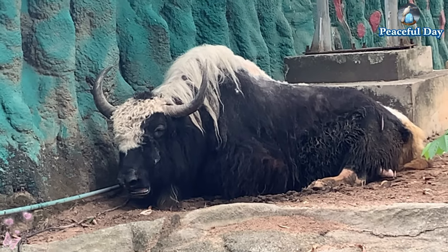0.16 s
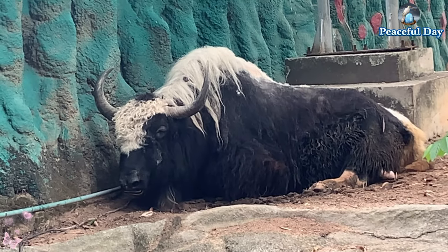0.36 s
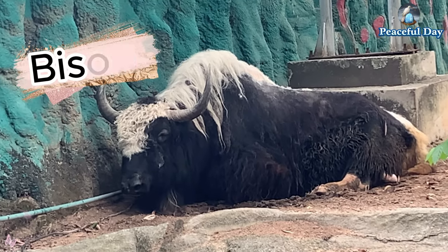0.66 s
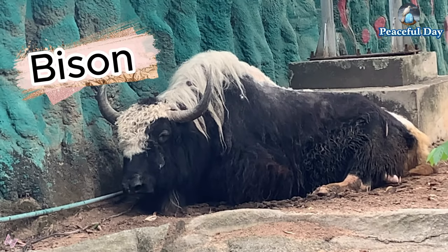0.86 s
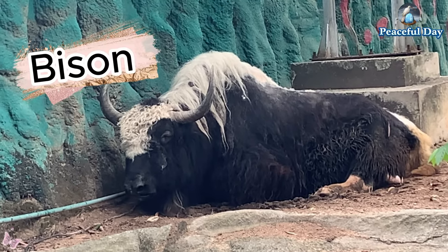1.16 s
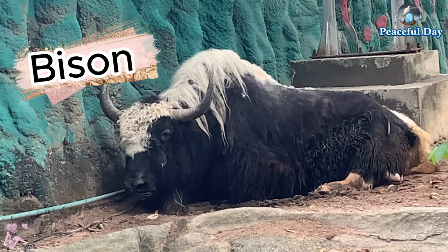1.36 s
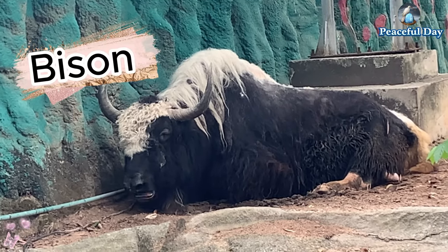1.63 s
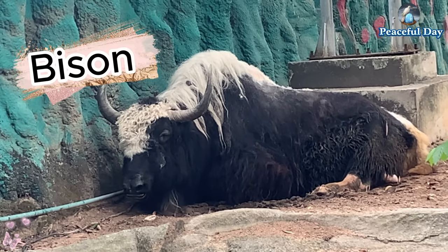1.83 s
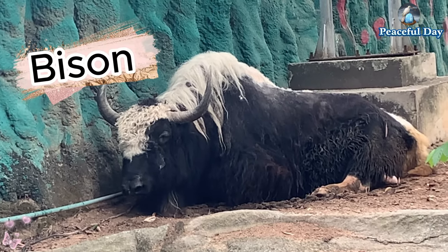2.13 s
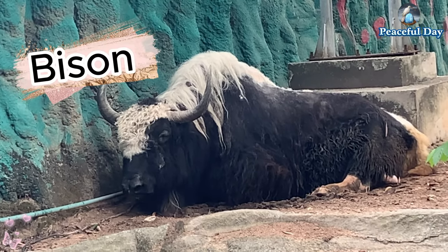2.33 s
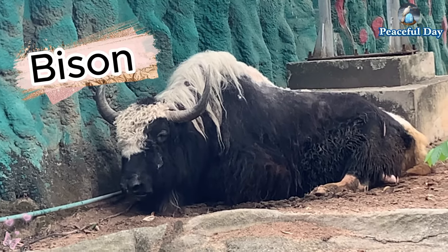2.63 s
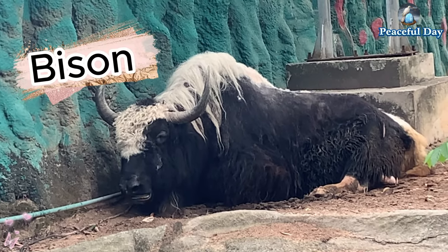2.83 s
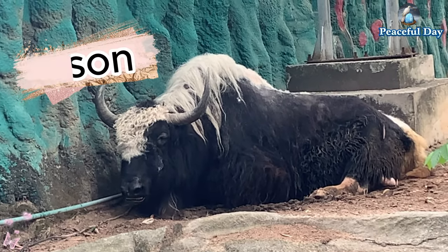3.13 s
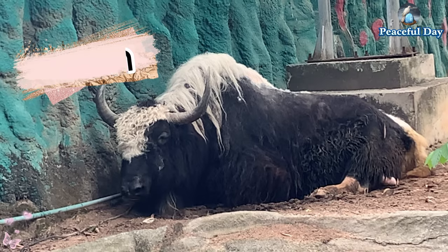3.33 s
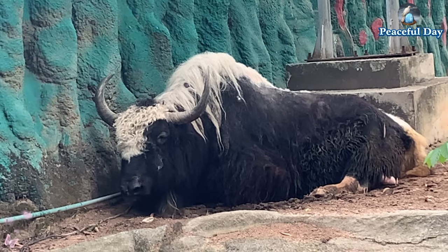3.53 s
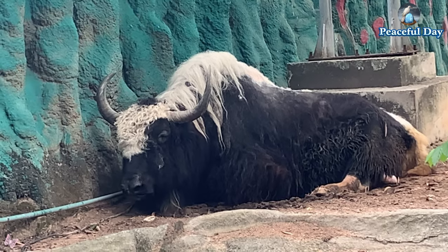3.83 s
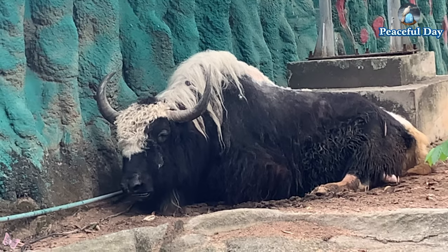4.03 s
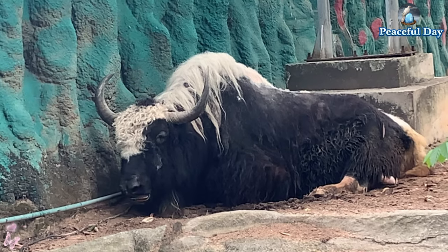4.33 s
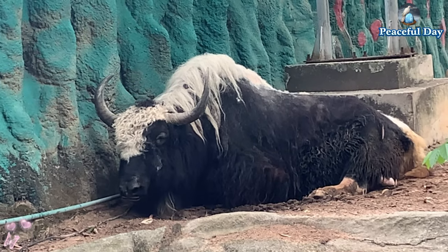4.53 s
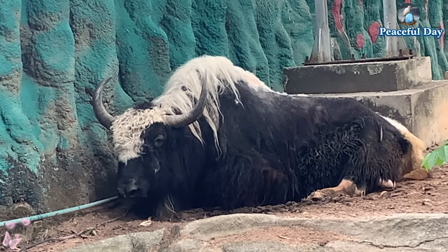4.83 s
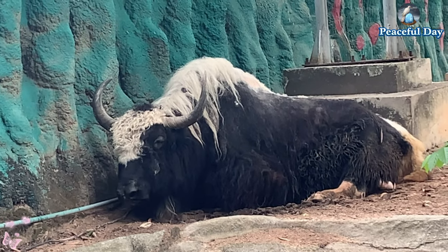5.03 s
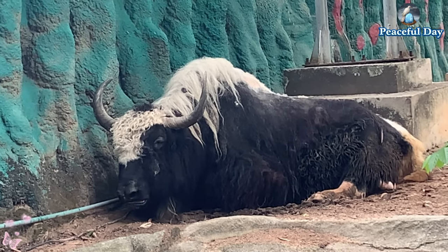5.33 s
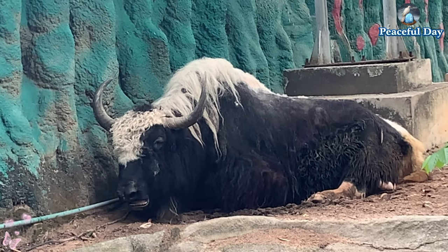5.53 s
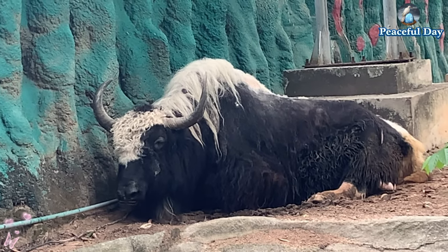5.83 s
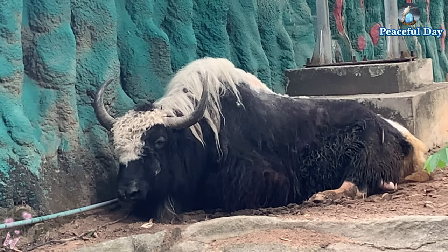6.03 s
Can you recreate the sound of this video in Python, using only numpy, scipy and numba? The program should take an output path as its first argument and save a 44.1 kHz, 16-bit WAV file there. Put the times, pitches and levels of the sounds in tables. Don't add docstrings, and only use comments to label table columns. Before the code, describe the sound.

A big shaggy yak rests close to the microphone in a hard-walled outdoor pen. It gives five low, pulsing grunts with short gaps. The first is strongest and sags into a slow croak with chest gulps and tiny nostril squeaks; the second flutters and rattles; the third and last fall steeply in pitch. Straw rustles, grit ticks, wind nudges the microphone, and faint town rumble and hiss stay beneath.

```python
import sys
import numpy as np
from scipy import signal
from scipy.fft import rfft, irfft, next_fast_len
from scipy.io import wavfile
from scipy.ndimage import uniform_filter1d
from numba import njit

SR = 44100
rng = np.random.default_rng(int(sys.argv[2]) if len(sys.argv) > 2 else 0)


def pcm_store(signal):
    levels = np.round(np.clip(np.atleast_2d(signal), -1, 1) * 32767)
    wavfile.write(sys.argv[1], SR, levels.astype(np.int16).T)


def boost(x):
    u = np.asarray(x, float) / 20
    return 10 ** u


N = 272097

# start_s, rate_hz [flaps per s], level_db
PALATE_FLUTTER = [
    (1.62, 29.1, -60),
    (1.918, 31.6, -14),
    (1.99, 31.6, -4),
    (2.18, 31.6, 1),
    (2.19, 28.6, -3),
    (2.32, 28.6, -7),
    (2.33, 25.5, -10),
    (2.45, 25, -20),
    (2.7, 24, -60),
]


def time():
    return np.arange(N) / SR


def bump(s, rise_s, fall_s):
    return np.maximum((s - time()) / rise_s, (time() - s) / fall_s)


def moments(table):
    return sum(height * np.exp(-bump(s, half_s, half_s) ** 2) for s, half_s, height in table)


def sounding(table):
    s, *columns = np.transpose(table)
    gate = np.interp(time(), [s[0] - .02, s[0], s[-1], s[-1] + .02], [0, 1, 1, 0])
    return gate, [np.interp(time(), s, c) for c in columns]


def steady(x, span_s):
    return x / np.sqrt(uniform_filter1d(x ** 2, int(span_s * SR)) + 1e-12)


@njit
def svf(x, hz, width):
    y, b, l = np.empty(len(x)), 0., 0.
    for i in range(len(x)):
        g = np.tan(np.pi * hz[i] / SR)
        k = np.pi * width / SR * (1 + g * g) / g
        v = (b + g * (x[i] - l)) / (1 + g * (g + k))
        b, l, y[i] = 2 * v - b, l + 2 * g * v, k * v
    return y


def band(x, hz, width):
    return svf(x + 1e-18, np.clip(hz, 20, .45 * SR) + np.zeros(N), float(width))


def ring(x, hz, width):
    once = band(x, hz, width)
    twice = band(once, hz, 0.51 * width)
    return band(twice, hz, 1.93 * width)


def decay(x, fall_s):
    return signal.lfilter([1], [1, -np.exp(-1 / (fall_s * SR))], x)


def walk(rate):
    k = int(SR / rate)
    held = np.repeat(rng.standard_normal(400), k)[:N]
    return 1.3 * uniform_filter1d(uniform_filter1d(held, k), k)


def colour(x, points):
    hz, db = np.transpose(points)
    size = next_fast_len(N)
    f = np.arange(1, size // 2 + 2) * SR / size
    gain = boost(np.interp(np.log(f), np.log(hz), db))
    y = irfft(rfft(x, size) * gain, size)[:N]
    return y / np.std(y)


def pulses(hz, rough, jitter, scatter_db):
    at = np.flatnonzero(np.diff(np.floor(np.cumsum(hz) / SR)) > 0)
    chance = rng.standard_normal((200, 2))[:len(at)].T
    place = np.clip(at + jitter * rough[at] * chance[0] * SR / hz[at], 0, N - 2)
    size = boost(scatter_db * rough[at] * chance[1])
    out, whole = np.zeros(N), place.astype(int)
    out[whole] = size * (1 - place + whole)
    out[whole + 1] = size * (place - whole)
    return out


def calling():
    # start_s, pitch_hz [fold pulses], level_db [effort], open_db [throat over chest]
    grunt_1 = [(.53, 46.4, -65, 0), (.584, 46, -28, 12), (.662, 46.87, -34.5, 20), (.774, 46.48, -19.5, 17),
               (.81, 42.7, -25.5, 24), (.845, 38.46, -19, -13.5), (.9, 38.1, -17, 1), (.99, 38.3, -20, 1.5),
               (1.08, 30.6, -20, 10)]
    tail_1 = [(1.1, 30.02, -33, 17), (1.14, 28.25, -22, -2.5), (1.19, 27.45, -21, -7),
              (1.245, 27.44, -28.5, -4), (1.3, 25.76, -34, -3), (1.368, 26.75, -36.5, -6),
              (1.41, 25.9, -33.5, -38), (1.5, 24.2, -36, -14), (1.62, 24.3, -58, -6)]
    grunt_2 = [(1.62, 29.1, -42.5, -1), (1.724, 30, -40, -10.5), (1.884, 31.3, -32.5, -12),
               (2.044, 31.6, -31.5, -3), (2.134, 31.6, -30.5, -5), (2.212, 28.6, -29.5, 0.5),
               (2.344, 25.4, -35.5, -4.5), (2.59, 24.4, -44, -11), (2.7, 24, -59, -3)]
    grunt_3 = [(2.8, 77.83, -59, 8), (2.851, 75.3, -32.5, -3), (2.877, 69, -27.5, -9),
               (2.919, 62.94, -30.5, 2), (2.96, 54.9, -25, 0), (3.01, 46.67, -26.5, -6),
               (3.099, 42.45, -26, -10), (3.25, 41.18, -23, -18), (3.35, 41.6, -26, -7)]
    tail_3 = [(3.36, 29.26, -24.5, -8), (3.414, 28.6, -34.5, -7), (3.614, 29.54, -31.5, -12.5),
              (3.71, 30.3, -30.5, -22), (3.744, 30.3, -36, -19), (3.83, 29.7, -42, -16),
              (3.88, 27.4, -68, -20)]
    grunt_4 = [(4.02, 47.02, -43.5, -7.5), (4.117, 45.5, -29, 5.5), (4.199, 46.04, -28, 7.5),
               (4.3, 47.48, -28, 12.5), (4.4, 46.5, -29, 12), (4.47, 44.4, -29.5, 12),
               (4.526, 42.8, -26.5, -2), (4.54, 41.7, -26, 14)]
    tail_4 = [(4.56, 44.1, -31, -1.5), (4.61, 44.8, -28.5, 19), (4.68, 45, -29, -13),
              (4.719, 43, -30.5, 17), (4.749, 41, -27.5, 14), (4.78, 39.4, -40.5, 11),
              (4.82, 36.26, -48, -8)]
    grunt_5 = [(5.53, 81.8, -51, -17), (5.598, 79.4, -28, -18), (5.696, 70.7, -22, -6),
               (5.848, 68.7, -26, -5.5), (5.933, 66.7, -32.5, 3), (6.0, 62.1, -30, -8),
               (6.052, 57.3, -30.5, -6), (6.136, 47.6, -26, -25), (6.17, 50.3, -38, -25)]
    # chest_hz, open_hz [throat], shut_hz [throat], mouth_hz, nose_hz
    airways = [
        (152, 230.3, 204, 480, 950),
        (153.5, 225, 207, 760, 1020),
        (144.4, 260, 217, 423, 1260),
        (138, 198.5, 197.7, 535, 1110),
        (139.5, 218, 181, 570, 1090),
        (157, 227, 192.5, 564, 912),
        (141.4, 157, 191, 522, 920),
        (136, 202, 219, 575, 1100),
    ]
    # chest_hz, throat_hz, mouth_hz, nose_hz
    widths = [(30.3, 54.5, 102, 270), (46.7, 34, 64, 230), (51.5, 135, 98, 540), (101, 36, 58, 860),
              (51.7, 71, 170, 310), (30.5, 32, 220, 200), (32, 44, 140, 310), (60, 40, 350, 810)]
    branches = [(-17.5, -16, -22, -17.5), (-16, -23.5, -34, -5), (-12.5, -5.5, -34, 13),
                (-36, -27, -14.5, -23.5), (-32, -21, -26.5, 7), (-11.5, -9.5, -21.5, 8),
                (-13.5, -14, -20.5, -7), (-20, -25, -21, -16)]
    # centre_s, half_length_s, level_db
    catches = [
        (0.624, 0.028, -22),
        (0.765, 0.012, -20.5),
        (1.014, 0.013, -4),
        (3.359, 0.0073, -4),
        (4.152, 0.0052, -20),
        (4.339, 0.0084, -10),
        (4.418, 0.0053, -18),
        (4.547, 0.0094, -14),
    ]
    calls = (grunt_1, tail_1, grunt_2, grunt_3, tail_3, grunt_4, tail_4, grunt_5)
    rough = [roughness()] * len(calls)
    return boost(moments(catches)) * sum(map(grunt, calls, airways, widths, branches, rough))


def roughness():
    # centre_s, half_length_s, added roughness [0-1]
    ragged = [(.7, .14, .14), (1.05, .06, .22), (1.25, .3, .05), (1.72, .22, .22), (2.15, .2, .05),
              (2.55, .2, .26), (2.85, .12, .12), (3.36, .035, .28), (3.95, .13, .27), (4.4, .2, .04),
              (4.58, .04, .1), (5.75, .2, .03), (6.17, .1, .05)]
    return .03 + moments(ragged)


def grunt(table, airway_hz, head, branch_db, rough):
    # centre_s, half_length_s, level_db
    snorts = [
        (.765, 0.028, 16.5),
        (.9, 0.042, 6),
        (2.9, .04, 7.5),
        (3.02, 0.039, 6),
        (4.24, .04, -1),
        (5.7, 0.077, 3.5),
    ]
    gate, (hz, effort_db, open_db) = sounding(table)
    chest_hz, open_hz, shut_hz, mouth_hz, nose_hz = airway_hz
    chest_width, throat_width, mouth_width, nose_width = head
    sinus_db, mouth_db, nose_db, nose_fade_db = branch_db

    share = 1 / (1 + boost(-2 * open_db))
    slack_db = np.clip(effort_db + 22, -25, 5)
    chest_db = effort_db + 10 * np.log10(1 - share)
    throat_db = effort_db + 10 * np.log10(share)
    mouth_db = effort_db + mouth_db + 0.11 * slack_db + 0.71 * (throat_db - effort_db)
    nose_db = effort_db + nose_db + 0.21 * slack_db + moments(snorts)
    nose_db = nose_db + nose_fade_db * np.clip(time() - table[0][0], 0, 1)

    chest_hz = chest_hz * (1 + 0.0028 * slack_db)
    mouth_hz = mouth_hz * (1 + 0.012 * slack_db)
    throat_hz = shut_hz + (open_hz - shut_hz) / (1 + boost(-open_db))

    flapping, (flap_hz, _) = sounding(PALATE_FLUTTER)
    pace_hz = np.where(flapping > 0, flap_hz, hz * (gate > 0))
    folds = pulses(pace_hz, rough, jitter=.22, scatter_db=8)
    puff = decay(folds, 0.015) * rng.standard_normal(N)
    voice = folds + 0.053 * rough * puff
    airy = folds + .025 * puff
    layers = [(chest_db, ring(voice, chest_hz, chest_width)),
              (throat_db, ring(voice, throat_hz, throat_width)),
              (throat_db + sinus_db, ring(voice, 302, 106)),
              (mouth_db, ring(airy, mouth_hz, mouth_width)),
              (nose_db, ring(airy, nose_hz, nose_width))]
    return gate * sum(boost(db) * steady(x, 0.0606) for db, x in layers)


def flutter():
    # centre_hz, width_hz, level_db
    palate = [
        (330, 800, 6),
        (620, 650, -1),
        (1130, 200, -5),
        (2390, 280, -5.5),
        (3750, 350, -18),
        (7600, 900, -14),
    ]
    gate, (hz, db) = sounding(PALATE_FLUTTER)
    slaps = pulses(hz * (gate > 0), np.ones(N), jitter=.01, scatter_db=1.5)
    slaps = slaps + .012 * decay(slaps, .003) * rng.standard_normal(N)
    late = np.roll(slaps, int(.001 * SR))
    rung = 0
    for f, width, level_db in palate:
        struck = late if f > 1000 else slaps
        rung = rung + boost(level_db) * ring(struck, f, width) / np.sqrt(width)
    return gate * boost(db - 40.5) * rung / np.std(rung[gate > 0])


def squeaks():
    # peak_s, pitch_hz [at the peak], level_db [peak]
    whistles = [(.975, 4600, -62), (.982, 2760, -56), (1.0, 4500, -62), (1.015, 2960, -60),
                (1.022, 4164, -60), (1.033, 4605, -59), (1.051, 4160, -53), (1.078, 4100, -54),
                (1.103, 4005, -51), (3.31, 4170, -53), (3.34, 4060, -58), (3.39, 4100, -55)]
    return blips(whistles, 0.0079)


def gulps():
    # peak_s, pitch_hz [at the peak], level_db [peak]
    swallows = [
        (.8, 108, -29),
        (1.08, 88.1, -36),
        (1.25, 115, -31),
    ]
    return blips(swallows, 0.021)


def blips(table, length_s):
    out = np.zeros(N)
    for s, hz, db in table:
        t = time() - s
        turns = hz * t * (1 + 0.051 * t / (4 * length_s))
        out += boost(db) * np.exp(-(t / length_s) ** 2) * np.sin(2 * np.pi * turns)
    return out


def ticks():
    # start_s, level_db [peak], centre_hz, ring_ms
    clicks = [(.501, -37, 7000, 1), (.543, -31, 8700, 1.6), (.58, -27, 9100, 1.7), (0.753, -39, 2470, 2.3),
              (2.519, -34.5, 2790, 4.6), (3.529, -25, 2940, 0.66), (3.541, -27.5, 1600, 0.46),
              (3.905, -29, 6450, .6), (3.917, -21.5, 5380, 0.81), (3.952, -29, 4400, 0.76),
              (4.792, -42, 5940, .6), (4.846, -22.5, 1020, 0.99), (5.148, -34, 1060, 2.6),
              (5.827, -32, 1175, 2.04)]
    out, t = np.zeros(N), np.arange(1500) / SR
    for s, db, hz, ring_ms in clicks:
        burst = (.08 * rng.standard_normal(len(t)) + (t == 0)) * np.exp(-1000 * t / ring_ms)
        centre = hz + 0 * t
        for width in (.8 * hz / ring_ms ** .4, 1.1 * hz / ring_ms ** .4, 2. * hz):
            burst = svf(burst, centre, width)
        out[int(s * SR):][:len(t)] += boost(db) * burst / np.abs(burst).max()
    return out


def pen_walls(near):
    # delay_s, level_db
    echoes = [
        (0.029, -14),
        (0.051, -14),
        (.083, -24),
    ]
    return sum(boost(db) * np.interp(time() - s, time(), near, left=0) for s, db in echoes)


def rustle():
    # peak_s, level_db, centre_hz, rise_s, fall_s
    bouts = [(.33, -53.5, 6470, .04, 0.2), (.586, -47, 8700, 0.058, 0.017), (.67, -60, 6600, 0.035, .02),
             (1.7, -54, 5570, 0.086, .1), (1.852, -47, 4940, 0.052, 0.061), (1.945, -57, 6000, 0.061, .015),
             (2.74, -56, 6800, .03, 0.026), (3.112, -48.5, 6480, 0.076, 0.079),
             (3.215, -50.5, 9400, 0.044, 0.012), (3.322, -54, 8280, 0.032, 0.017),
             (3.912, -48, 5370, 0.026, 0.06), (4.618, -58, 8070, 0.027, .03),
             (4.79, -49.5, 6870, 0.012, 0.05), (4.96, -57, 7100, .025, .12),
             (5.665, -48, 7500, 0.045, 0.13)]
    gain = sum(boost(db - 10 * bump(s, rise_s, fall_s)) for s, db, _, rise_s, fall_s in bouts)
    centre_hz = np.interp(time(), *np.transpose(bouts)[[0, 2]])
    broad, noise, out = snaps(90, spread_db=2.5), rng.standard_normal(N), 0
    for hz in (2300, 3200, 4500, 6300, 8500, 11000, 14000):
        near = boost(-4 * np.log2(hz / centre_hz) ** 2)
        activity = broad + snaps(350, spread_db=2.5) + 0.3
        out = out + near * activity * band(noise, hz, hz / 3)
    return gain * steady(out, 0.075)


def snaps(rate, spread_db):
    size = boost(spread_db * np.minimum(rng.exponential(size=N), 2.5))
    return decay((rng.random(N) < rate / SR) * size, 0.0007)


def wind():
    # peak_s, level_db [peak], half_length_s
    gusts = [(1.77, -50, 0.086), (2.13, -52, .08), (2.46, -40, 0.078), (2.61, -54, 0.047),
             (2.8, -44, 0.031), (3.59, -51, 0.055), (4.38, -44, .06), (4.86, -48, 0.11), (5.29, -47, .045),
             (5.8, -50, .2), (6.08, -37, .07)]
    buffets = sum(boost(db) * np.exp(-bump(s, half_s, half_s) ** 2) for s, db, half_s in gusts)
    rumble = steady(ring(rng.standard_normal(N), 43.2, 28), 0.26)
    restless = boost(-54 + 3.5 * walk(3.7))
    return rumble * (restless + buffets)


def town():
    # frequency_hz, level_db [per Hz]
    spectrum = [
        (44, -55),
        (75, -1.5),
        (125, 3.5),
        (190, -7),
        (763, -9),
        (1590, -15),
        (2180, -19.5),
        (15500, -41),
    ]
    noise, swell, out = colour(rng.standard_normal(N), spectrum), walk(1.0), 0
    for hz in 80 * 2 ** np.arange(0, 7.8, .5):
        restless = min(1, (1500 / hz) ** .5)
        flicker = boost(restless * (.5 * swell + 1.9 * walk(9.9)))
        out = out + flicker * band(noise, hz, hz / 2)
    return boost(-42) * out / np.std(out)


def hiss():
    return boost(-58.5) * rng.standard_normal(N)


def scene():
    near = calling() + flutter() + squeaks() + gulps() + ticks()
    return (near + pen_walls(near) + rustle() + wind() + town() + hiss())[None]


def top_cut(x):
    return signal.sosfilt(signal.butter(12, 15730, fs=SR, output="sos"), x)


def record(dry):
    low_pass = signal.ellip(8, .2, 70, 15750, fs=SR, output="sos")
    return top_cut(signal.sosfilt(low_pass, dry))


dry = scene()
out = record(dry)
pcm_store(out)
```